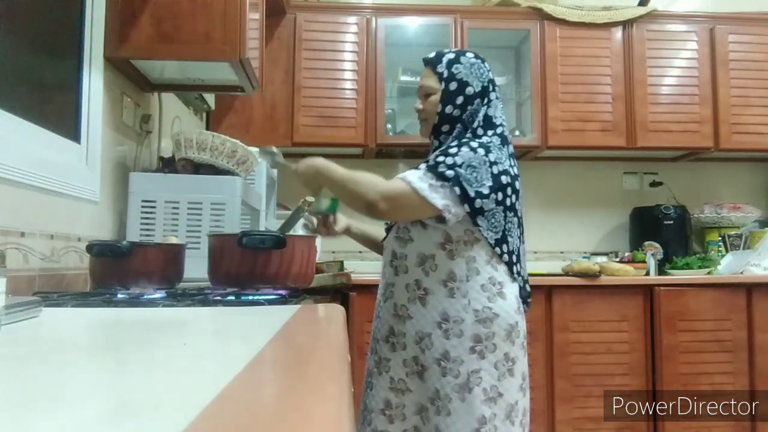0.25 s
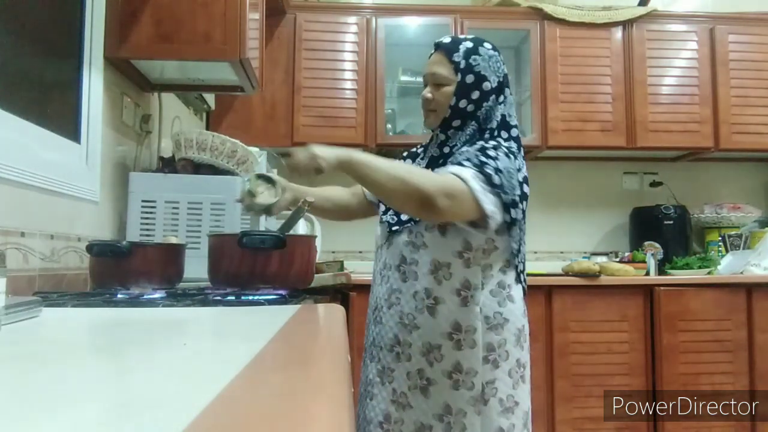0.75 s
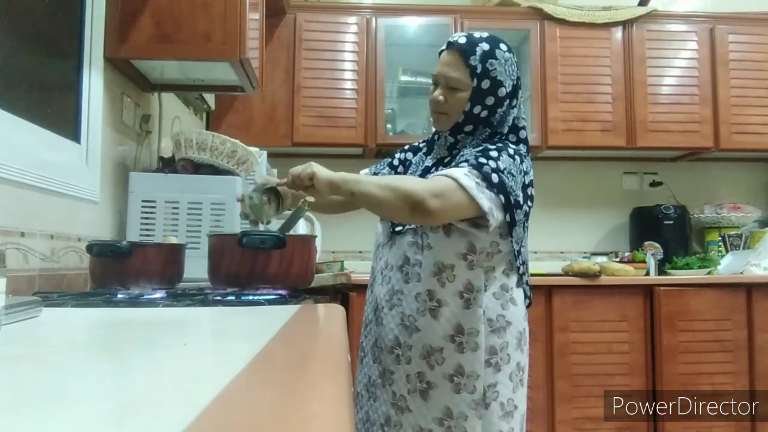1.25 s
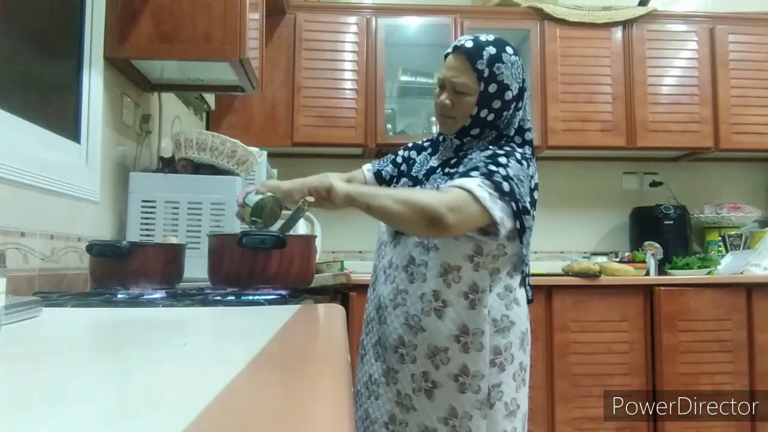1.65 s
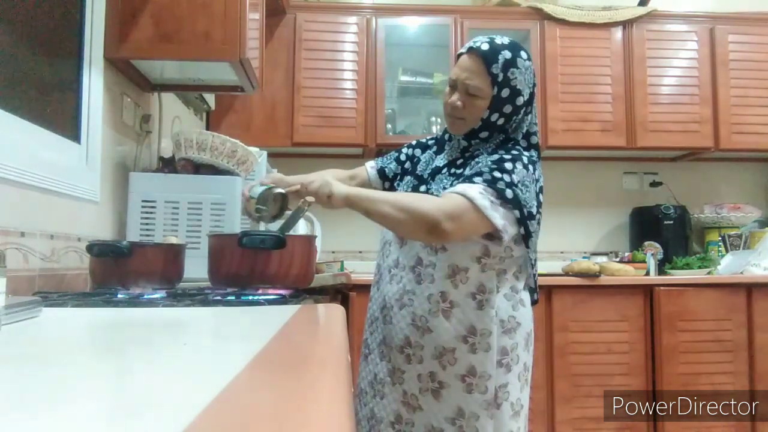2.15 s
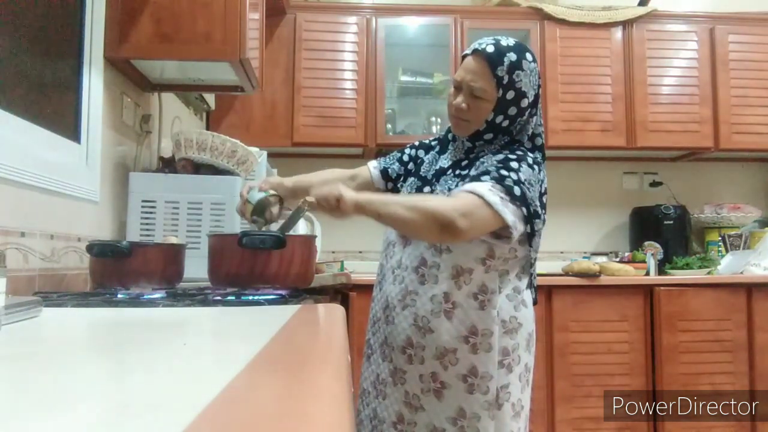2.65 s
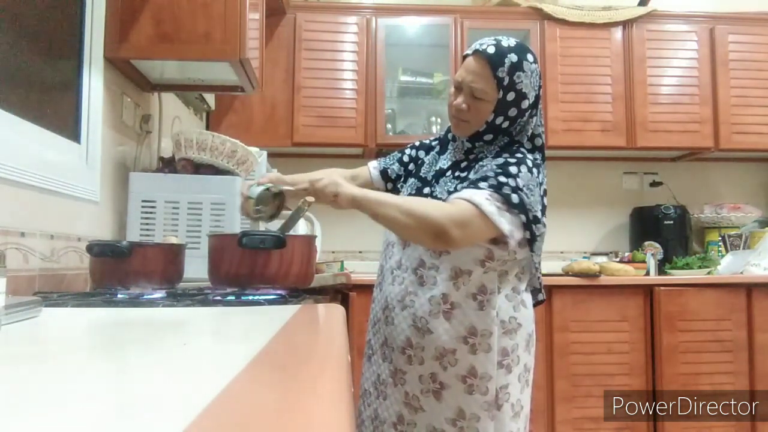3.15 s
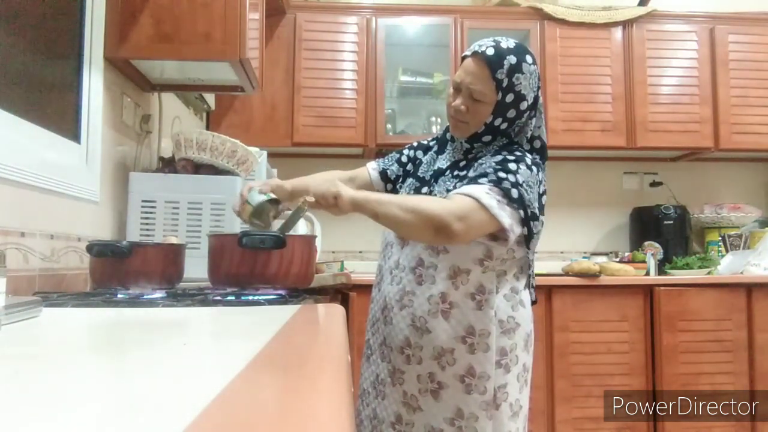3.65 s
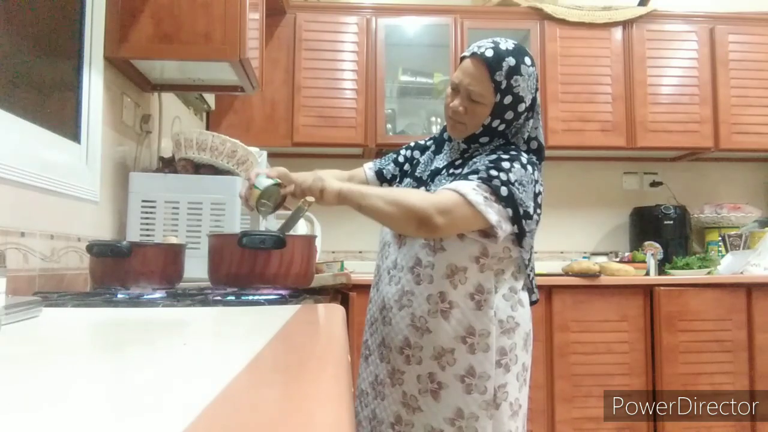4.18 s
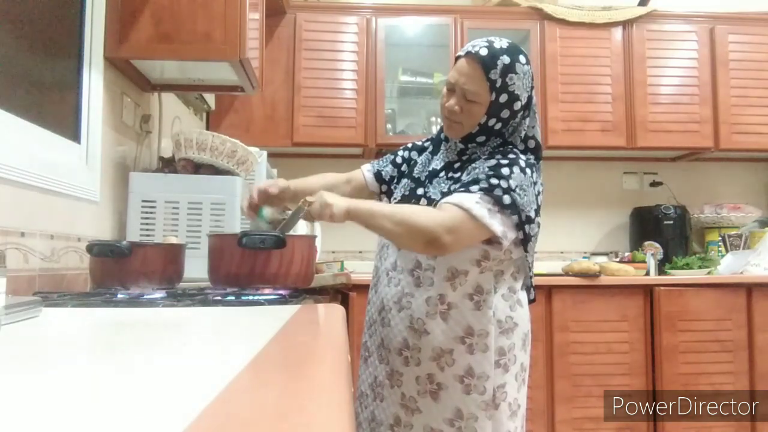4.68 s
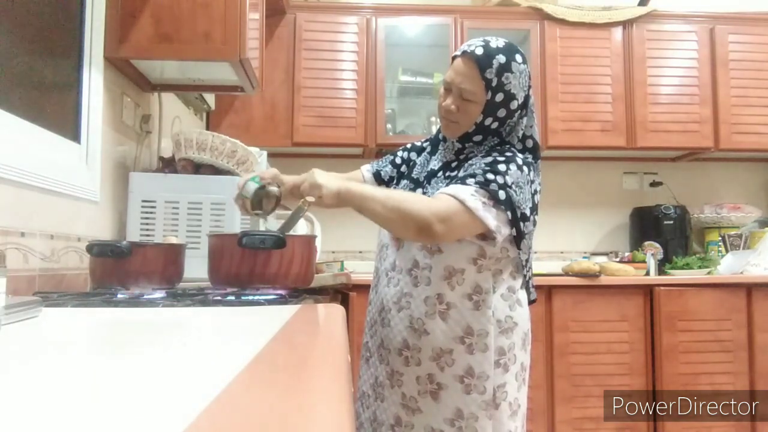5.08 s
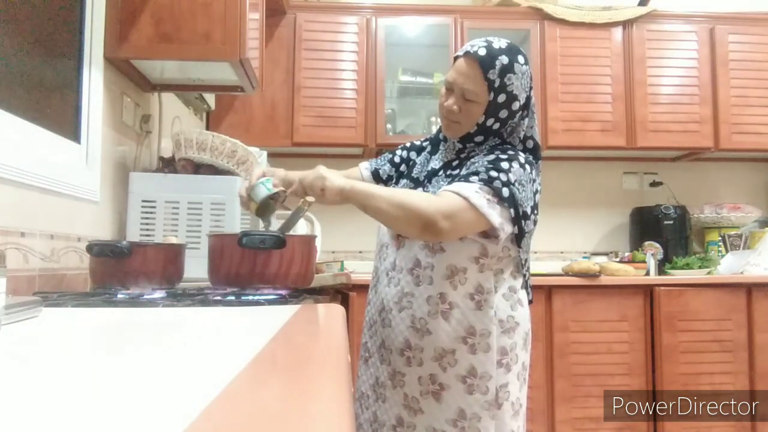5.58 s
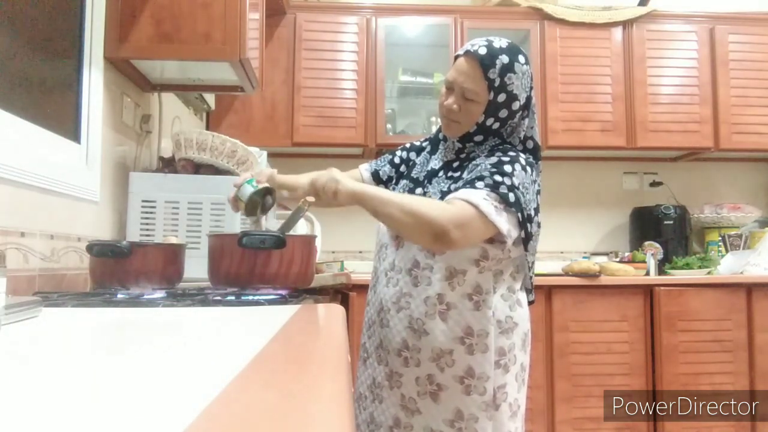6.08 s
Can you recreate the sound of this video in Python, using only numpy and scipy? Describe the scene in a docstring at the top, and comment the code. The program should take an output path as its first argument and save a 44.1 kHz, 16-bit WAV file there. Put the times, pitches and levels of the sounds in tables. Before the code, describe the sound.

A spoon works at a hand-held tin can above a simmering pot. Sizzle and fizz are strongest at the start and fade, leaving uneven bubbling, small squeaks and dull plops. Short, damped tinny knocks come singly, then in tight clusters with quick rebounds and sliding scrapes that sink in pitch. The hard-walled kitchen rings for about half a second. Single-channel household pickup, slightly processed, with soft burner noise underneath and a faint hollow note last.

```python
"""A metal spoon knocks on and slides along a hand-held open tin can, over a pot on a gas stove, in a tiled kitchen.
The knocks are banks of short damped modes with a noise crack; slides and rebounds follow, and the room rings on.
The pot's bubbling is resonances driven by tiny bursts; pings, squeaks, thuds and an early fizz join it.
The burner is shaped noise over a low hum; near the end a faint hollow tone sets in, a wavering sine."""
import sys
import numpy as np
from scipy import signal
from scipy.fft import rfft, irfft, next_fast_len
from scipy.io import wavfile
from scipy.ndimage import uniform_filter1d, map_coordinates

SR = 44100
rng = np.random.default_rng(int(sys.argv[2]) if len(sys.argv) > 2 else 0)


def unload_audio(sound):
    """Save the sound as a 16-bit wav file, at the path given as the first command line argument."""
    columns = np.transpose(np.atleast_2d(sound))
    # keep every value between -1 and 1, then stretch to whole-number steps
    steps = np.round(np.clip(columns, -1, 1) * 32767)
    wavfile.write(sys.argv[1], SR, steps.astype(np.int16))


N = 278887
TIME = np.arange(N) / SR
# Seven registers of the can's ring, from bottom boom to rim tick. Edges in Hz.
REGISTER_EDGES_HZ = [400, 850, 1700, 2550, 3850, 5200, 6700, 11000]


def gain_of(db):
    """Decibels to amplitude."""
    return 10 ** (np.asarray(db) / 20)


def evened(x):
    """Scales to rms 1."""
    return x / np.sqrt(np.mean(x ** 2) + 1e-20)


def read(points, hz):
    """Reads a spectrum on a log-frequency axis."""
    f, value = np.transpose(points)
    return np.interp(np.log(hz + 1), np.log(f + 1), value)


def curves(rows):
    """Each column after the time in seconds, as a curve over the whole time."""
    s, *columns = np.transpose(rows)
    return [np.interp(TIME, s, column) for column in columns]


def add(mix, s, sound):
    """Mixes a sound in at a time in seconds."""
    part = mix[max(round(s * SR), 0):][:len(sound)]
    part += sound[:len(part)]


def resonate(x, hz, width_hz):
    """One resonance, at rms 1."""
    b, a = signal.iirpeak(min(hz, .45 * SR), hz / width_hz, SR)
    return evened(signal.lfilter(b, a, x))


def kitchen(x, wet_db, gap_s=.003, early_db=-9, early_span_s=.03):
    """Direct sound, eight reflections off tiles and cupboards, and a tail with its own decay at each pitch."""
    # Each row: frequency in Hz, t60 in s.
    decay_times = [(100, 0.4), (300, 0.52), (800, 0.54), (2100, 0.48), (4500, 0.43), (8000, 0.16),
                   (15000, 0.4)]
    taps = rng.standard_normal(SR) * (rng.random(SR) < 5000 / SR)
    hz, t, z = signal.stft(taps, SR, nperseg=256)
    decay = gain_of(-60 * t / read(decay_times, hz)[:, None])
    tail = signal.istft(z * decay, SR, nperseg=256)[1]
    tail[:round(gap_s * SR)] = 0
    response = gain_of(wet_db) * tail / np.linalg.norm(tail)
    response[0] += 1
    at = (SR * (gap_s + early_span_s * rng.random(size=8))).astype(int)
    response[at] += gain_of(early_db) * rng.choice([-1, 1], size=8)
    return signal.fftconvolve(x, response / np.linalg.norm(response))[:N]


def stove(hiss_db=-60, waver_db=-1):
    """Burner hiss and room noise as shaped noise, over a hum of steady tones with a wavering part."""
    # Each row: frequency in Hz, relative density in dB per Hz.
    hiss_spectrum = [(25, -19), (45, -6.5), (80, -2.5), (125, 1.5), (220, -4.5), (280, -6.5), (400, -7),
                     (700, 5), (1400, -4), (3000, -2), (6000, -1), (7900, 5.5), (10500, -7.5), (15500, -21)]
    # Each row: frequency in Hz, width in Hz, level in dB before the swell.
    hum_tones = [(109.5, 7, -76), (154.5, 13.5, -80.5)]
    # Each row: time in s, hum gain in dB.
    hum_swell = [(0, 1), (2.3, 0.5), (2.7, 4), (3.3, -1), (6.32, 0)]
    size = next_fast_len(N)
    shape = gain_of(read(hiss_spectrum, np.fft.rfftfreq(size, 1 / SR)))
    hiss = irfft(rfft(rng.standard_normal(size)) * shape, size)[:N]
    hum = 0
    for hz, width_hz, db in hum_tones:
        waver = resonate(resonate(rng.standard_normal(N), hz, width_hz), hz, 3 * width_hz)
        steady = np.sqrt(2) * np.sin(2 * np.pi * hz * TIME)
        hum = hum + gain_of(db) * evened(steady + gain_of(waver_db) * waver)
    return gain_of(hiss_db) * evened(hiss) + gain_of(curves(hum_swell)[0]) * hum


def hollow_tone(waver=0.014, flutter_db=3.0, trim_db=-7):
    """A faint sine that sags and recovers, with random drift in pitch (rms share) and level (rms dB)."""
    # Each row: time in s, frequency in Hz, level in dB before trim and flutter.
    tone = [(5.915, 460, -91), (5.94, 463, -57), (6.06, 457.4, -52), (6.14, 438.5, -53.5),
            (6.19, 445.6, -54), (6.32, 474, -53)]
    hz, db = curves(tone)
    drift, flutter = (evened(uniform_filter1d(row, size=700)) for row in rng.standard_normal((2, N)))
    wave = np.sqrt(2) * np.sin(2 * np.pi * np.cumsum(hz * (1 + waver * drift)) / SR)
    return gain_of(db + trim_db + flutter_db * flutter) * (TIME > tone[0][0]) * wave


def simmer_levels_db():
    """Levels of the low bubbling, with its surges, and of the bright spatter; both fall slowly."""
    # Each row: centre in s, lift in dB.
    surges = [(.22, 2.5), (.86, 4.5), (1.08, 2), (1.55, 4.5), (1.801, 10.5), (2.36, 9), (2.93, 4.5),
              (3.68, 5.5), (3.96, 3.5), (4.12, 6.5), (5.17, 2.5), (5.4, -1.5), (6.05, 6)]
    surge_s, swell_db, swell_step_s = 0.1, 1, .16
    bubbling_db, bubbling_fall_db_per_s = -64.5, 0.6
    spatter_db, spatter_fall_db_per_s = -62, .5
    turns_s = np.arange(100) * swell_step_s
    swell = swell_db * np.interp(TIME, turns_s, rng.standard_normal(len(turns_s)))
    surge = sum(db * np.exp(-((TIME - s) / surge_s) ** 2) for s, db in surges)
    return (bubbling_db - bubbling_fall_db_per_s * TIME + swell + surge,
            spatter_db - spatter_fall_db_per_s * TIME + swell)


def pot(bursts_per_s=1200, spread_db=2.0, patchy_db=3.0, patch_s=.035, split_hz=1400):
    """Dense tiny bursts drive the pot's resonances; each swells and fades at random."""
    # Each row: frequency in Hz, width in Hz, level in dB relative to its side of the split.
    pot_modes = [(332.6, 13.4, -11), (600, 55, -1), (700, 70.5, 9), (1150, 39, -0.5), (1762.5, 31.6, 4),
                 (2053, 76, 3.5), (2312, 60, 8.5), (2900, 87, 5.5), (3660, 21, -2.5), (4050, 49, 4),
                 (4560, 220, 5.5), (5300, 98, -18), (5990, 99, 1)]
    strength = gain_of(spread_db * np.minimum(rng.exponential(1, N), 4))
    bursts = rng.standard_normal(N) * strength * (rng.random(N) < bursts_per_s / SR)
    knots_s, low, bright = np.arange(400) * patch_s, 0, 0
    for hz, width_hz, db in pot_modes:
        swell = gain_of(patchy_db * np.interp(TIME, knots_s, rng.standard_normal(len(knots_s))))
        ring = gain_of(db) * resonate(resonate(bursts * swell, hz, width_hz), hz, 4 * width_hz)
        if hz < split_hz:
            low = low + ring
        else:
            bright = bright + ring
    low_db, bright_db = simmer_levels_db()
    return gain_of(low_db) * evened(low) + gain_of(bright_db) * evened(bright)


def sizzle(pops_per_s=700, lo_hz=2100, hi_hz=9000, t60_s=0.029, spread_db=6.0, tilt_db_per_octave=-4):
    """Small bubbles burst in the hot pot, each a short ping of its own pitch."""
    # Each row: time in s, level in dB.
    sizzle_level = [(0, -61.5), (1.4, -61), (3, -67), (4.5, -70), (6.32, -101)]
    out, t = np.zeros(N), np.arange(2000) / SR
    rise = 1 - np.exp(-t / 0.0054)
    for when, place, size in rng.random((round(pops_per_s * N / SR), 3)):
        hz = lo_hz + (hi_hz - lo_hz) * place
        db = spread_db * min(-np.log(size + 1e-9), 3.5) + tilt_db_per_octave * np.log2(hz / lo_hz)
        add(out, when * N / SR, gain_of(db - 60 * t / t60_s) * rise * np.sin(2 * np.pi * hz * t))
    return gain_of(curves(sizzle_level)[0]) * evened(out)


def fizz(ticks_per_s=2500, lo_hz=2800, hi_hz=4050, start_db=-61, fall_db_per_s=21):
    """Band-passed random ticks: a fine, even fizz that soon dies away."""
    ticks = rng.standard_normal(N) * (rng.random(N) < ticks_per_s / SR)
    sos = signal.butter(3, (lo_hz, hi_hz), "band", fs=SR, output="sos")
    return gain_of(start_db - fall_db_per_s * TIME) * evened(signal.sosfilt(sos, ticks))


def squeak(hz, db, length_s, width_hz=42, glide_hz=100):
    """Noise through one narrow resonance, resampled so that it slides a little up or down."""
    drive = rng.standard_normal(SR // 2)[:round(length_s * SR)]
    note = resonate(resonate(drive, hz, width_hz), hz, 2 * width_hz)
    speed = 1 + glide_hz / hz * rng.uniform(-0.97, 1) * np.linspace(-1, 1, len(note))
    return gain_of(db) * map_coordinates(note, [np.cumsum(speed)]) * signal.windows.tukey(len(note), .5)


def squeaks(trim_db=-4):
    """Clear squeaks of steam and of the spoon on the tin, and a thinning scatter of faint ones."""
    # Each row: start in s, frequency in Hz, level in dB before the trim, length in s.
    clear_squeaks = [(0.084, 10340, -64, 0.1), (0.138, 4010, -51.5, 0.063), (0.172, 9380, -64, 0.09),
                     (0.282, 9480, -56.5, 0.081), (0.417, 13200, -70, 0.046), (0.594, 9650, -61, 0.21),
                     (0.707, 4730, -56, 0.072), (0.774, 2915, -50, 0.03), (1.146, 2914, -55, .06),
                     (1.426, 4730, -60, 0.03), (1.45, 7520, -58, 0.038), (1.949, 4560, -55, 0.19),
                     (2.046, 3010, -54.5, 0.077), (2.472, 4050, -61, 0.093), (2.541, 1770, -61.5, 0.051),
                     (2.605, 4660, -55.5, 0.036), (2.622, 984, -62, 0.12), (2.65, 2804, -60.5, 0.046),
                     (2.661, 4050, -59, 0.047), (2.815, 2855, -57, 0.041), (2.875, 4526, -55.5, .05),
                     (3.08, 5375, -59.5, 0.045), (3.241, 4050, -52.5, 0.021), (3.575, 2896, -57.5, 0.047),
                     (3.635, 2523, -54, 0.034), (3.824, 9700, -56, 0.048), (4.438, 2140, -56, 0.061),
                     (4.577, 2730, -62, .04), (4.645, 2994, -60, 0.028), (4.827, 966, -51.5, 0.085),
                     (4.96, 3970, -56, 0.013), (5.013, 4520, -57.5, 0.035), (5.056, 1034, -60, 0.102),
                     (5.254, 4450, -57.5, 0.034), (5.352, 2363, -59, 0.048), (5.382, 4580, -56.5, 0.039),
                     (5.538, 2940, -55.5, 0.039), (5.729, 4500, -54, .05), (5.798, 2336, -60.5, 0.054),
                     (6.008, 2880, -58, 0.047), (6.06, 4494, -53.5, 0.022)]
    stray_per_s, calm_s = 42, 1.4  # rate at the start, time in which it falls to 1/e
    lo_hz, hi_hz, stray_s = 2402, 10840, 0.0395
    stray_db, rise_db_per_s, tilt_db_per_octave = -65, 0.2, -1.5
    out = np.zeros(N)
    for s, hz, db, length_s in clear_squeaks:
        add(out, s, squeak(hz, db + trim_db, length_s))
    for when, place, span in rng.random((round(stray_per_s * calm_s), 3)):
        start_s = -calm_s * np.log(1 - when)
        octaves = place * np.log2(hi_hz / lo_hz)
        db = stray_db + tilt_db_per_octave * octaves + rise_db_per_s * start_s
        add(out, start_s, squeak(lo_hz * 2 ** octaves, db, stray_s * (.5 + span)))
    return out


def bumps(swell_s=0.011, trim_db=-5):
    """Bumps of the can and food dropping into the pot: soft-started, quickly damped sines; crumbs thin out."""
    # Each row: start in s, frequency in Hz, level in dB before the trim.
    clear_bumps = [(0.122, 338, -59.5), (.248, 334, -61), (0.483, 115, -57), (.85, 617, -51.5),
                   (1.12, 378, -59.5), (1.321, 140, -58.5), (1.79, 114, -60), (1.809, 352, -63),
                   (2.215, 324, -59), (2.325, 585, -53.5), (2.465, 609, -56.5), (2.919, 347, -56.5),
                   (3.402, 338, -58.5), (3.618, 700, -52.5), (3.69, 690, -54.5), (4.38, 345, -59.5),
                   (4.396, 600, -41), (4.49, 640, -53), (4.66, 690, -55.5), (4.722, 620, -46.5),
                   (4.97, 617, -49.5), (5.155, 607, -54.5), (6.052, 152, -58)]
    crumbs_per_s, crumb_lo_hz, crumb_hi_hz, crumb_db = 3.6, 300, 518, -72
    out, t = np.zeros(N), np.arange(SR // 4) / SR
    shape = (t / swell_s * np.exp(1 - t / swell_s)) ** 2
    for s, hz, db in clear_bumps:
        add(out, s, gain_of(db + trim_db) * shape * 2 * np.sin(2 * np.pi * hz * t))
    for when, place in rng.random((round(crumbs_per_s * N / SR), 2)):
        hz = crumb_lo_hz + (crumb_hi_hz - crumb_lo_hz) * place
        add(out, when ** 2 * N / SR, gain_of(crumb_db) * shape * 2 * np.sin(2 * np.pi * hz * t))
    return out


def blow(registers_db, crack_db, lift_db, notes_hz, detune=0.0015, crack_t60_s=0.011, spread_db=3.0,
         rise_cycles=1.4):
    """One contact: the can's modes build up within a few cycles, over a short crack; picked ones stand out."""
    # Modes of the hand-held can and spoon. Each row: frequency in Hz, level in dB within its register, t60 in s.
    can_modes = [(590, -1, .07), (655, 0, .08), (695, 0, .07), (735, -3, .05), (860, -5, .04),
                 (960, -3, .04), (1040, -4, .05), (1150, -3, .05), (1233, -3, .05), (1324, -5, .04),
                 (1500, -1, .05), (1715, -3, .05), (1950, -3, .06), (2010, -5, .05), (2081, -2, .07),
                 (2196, 0, .08), (2275, -4, .05), (2430, -6, .04), (2520, -6, .04), (2680, -3, .05),
                 (2740, -4, .04), (2840, -4, .05), (2955, -2, .06), (3030, -4, .04), (3290, -1, .05),
                 (3430, -1, .05), (3550, -1, .06), (3680, -3, .05), (3840, -5, .04), (4050, 0, .06),
                 (4120, -1, .05), (4260, -1, .05), (4350, -2, .04), (4420, -1, .05), (4570, -1, .09),
                 (4850, -2, .05), (5130, -4, .04), (5330, -3, .03), (5690, -3, .03), (5970, 0, .06),
                 (6260, -2, .03), (7100, -3, .04), (7500, -2, .05), (8280, -5, .04), (9545, -7, .05)]
    rank_step_db = 0.86  # each picked mode is lifted this much less than the one before
    t = np.arange(6000) / SR
    hz, db, t60_s = np.transpose(can_modes)[:, :, None]
    luck, shift, turn = rng.standard_normal((len(can_modes), 3)).T[:, :, None]
    lifts = []
    for rank, note_hz in enumerate(notes_hz):
        distance_hz = abs(hz - note_hz)
        lifts.append((lift_db - rank_step_db * rank) * (distance_hz == distance_hz.min()))
    db = db + spread_db * luck + np.max(lifts, axis=0) - 60 * t / t60_s
    modes = gain_of(db) * np.sin(2 * np.pi * hz * (1 + detune * shift) * t)
    modes *= np.sign(turn) * (1 - np.exp(-t * np.minimum(hz, 4000) / rise_cycles))
    crack = rng.standard_normal(len(t)) * gain_of(-60 * t / crack_t60_s)
    out = 0
    for lo_hz, hi_hz, level_db in zip(REGISTER_EDGES_HZ, REGISTER_EDGES_HZ[1:], registers_db):
        ring = evened(modes[(hz[:, 0] >= lo_hz) & (hz[:, 0] < hi_hz)].sum(0))
        sos = signal.butter(3, [lo_hz, min(hi_hz, 8500)], "band", fs=SR, output="sos")
        rough = evened(signal.sosfilt(sos, crack))
        out = out + gain_of(level_db) * evened(ring + gain_of(crack_db) * rough)
    return out


def slide(ring, length_s, sag_per_s, slips_per_s=600, bend=0.013, bend_step_s=0.038):
    """The spoon slips along the tin; its pressure flexes the wall, so the modes wander and sink."""
    t, turns_s = np.arange(SR // 2) / SR, np.arange(40) * bend_step_s
    envelope = t * np.exp(-(2 * t / length_s) ** 2)
    slips = rng.standard_normal(len(t)) * (rng.random(len(t)) < slips_per_s / SR) * envelope
    scrape = signal.fftconvolve(slips, ring)[:len(t)]
    scrape = scrape * np.linalg.norm(ring) / np.linalg.norm(scrape)
    speed = 1 - sag_per_s * t + bend * np.interp(t, turns_s, rng.standard_normal(len(turns_s)))
    return map_coordinates(scrape, [np.cumsum(speed)])


def knocks(low_hz=400):
    """Each knock, the short scrape that follows it, and rebounds that each lift (or, once, dip) the ring around
    one pitch."""
    # Where the spoon lands sets the registers and modes. Each row: start in s, level of each register in dB,
    # crack against ring in dB, lift of the picked modes in dB, slide against ring in dB, slide length in s,
    # pitch sag in share per s, picked modes in Hz with the strongest first.
    knock_rows = [(1.2219, (-70.5, -56, -59.5, -52, -64, -76, -90),
                  -43, 23.5, -8.5, 0.047, .03, (3290, 960, 3680, 2955, 1040, 1950, 2275, 4050, 2840, 3430)),
                  (2.211, (-63.5, -56.5, -57, -60, -52, -57, -60.5),
                  -17, 18, -24, 0.091, 0.17, (2275, 1150, 735, 4050, 4420, 2955, 4850, 7500, 5690, 6260)),
                  (3.329, (-67, -59.5, -80, -60, -58.5, -64, -73),
                  -25, 16, -3.5, .035, 0.075, (4120, 1500, 5970, 3030, 2955, 5130)),
                  (3.342, (-60, -71, -69, -76, -76, -82, -87),
                  -28, 39, -5, 0.034, .1, (590, 1233, 695, 2010)),
                  (3.3929, (-48, -47.5, -52.5, -55.5, -61, -71, -66),
                  -11.5, 15.5, -14, .13, 0.067, (695, 1233, 1715, 1324, 3550, 2275, 2430, 5130, 4570, 8280)),
                  (4.172, (-94, -56, -80, -86, -85, -74.5, -71), -34, 26, -28, .04, .05, (1500,)),
                  (4.219, (-50, -51.5, -45, -56, -63.5, -85, -67),
                  -31, 21.5, -19, 0.029, .05, (2081, 695, 2196, 1500, 1233, 3550, 4350, 2840, 3840, 2680, 8280)),
                  (4.311, (-64, -69.5, -59.5, -60, -79, -85, -85),
                  -8, 18, 0, 0.062, 0.26, (3550, 2196, 590, 2840, 2680, 1233)),
                  (4.357, (-64, -58.5, -66, -60, -78, -85, -85),
                  -14, 10, -12, 0.06, 0.17, (1500, 3430, 2196, 590)),
                  (4.741, (-49, -50.5, -56.5, -53, -58.5, -54.5, -63),
                  -27, 22, -11.5, 0.044, .05, (1500, 655, 2955, 1150, 4420, 5970, 1950, 2275, 3290, 9545)),
                  (4.758, (-50, -58.5, -54, -59.5, -57.5, -74, -69),
                  -30, 34, -4.5, 0.054, 0.21, (655, 1950, 2196, 4420, 1150, 2081, 3290, 4850, 2740)),
                  (4.812, (-62, -53.5, -55, -62.5, -59, -68, -80),
                  -17, 20, -5, 0.063, 0.42, (1150, 860, 2081, 4260, 4120, 3290, 2520, 1950)),
                  (4.879, (-68, -63, -71, -65.5, -89, -88, -86),
                  -16, 28, -7, 0.055, 0.46, (1040, 1150, 2740, 1324, 3290, 2081, 655)),
                  (5.46, (-63.5, -60.5, -60.5, -72, -67, -90, -87),
                  -36, 32, -11.5, 0.023, .1, (1500, 2196, 590, 1040, 4050, 4570, 2740)),
                  (5.6129, (-58.5, -57, -65.5, -48.5, -49, -67, -69),
                  -9, 16, -5, 0.15, 0.094, (3430, 1500, 590, 4260, 4570, 1233, 4050, 3550, 7100))]
    # Each row: start in s, level in dB against the knock before, favoured frequency in Hz, lift there in dB.
    rebounds = [(1.274, -11.5, 2140, 5.5), (2.243, -14.5, 1200, 10), (2.291, -14.5, 1310, 7.5),
                (3.412, -12, 700, 9), (3.453, -10.5, 2200, 8), (3.564, -19.5, 1300, 2.5),
                (4.2232, -1, 2100, 4.5), (4.236, -16, 660, 19), (5.6171, 2.5, 4400, -3),
                (5.628, -18.5, 585, 22.5), (5.645, -10.5, 4320, 8)]
    focus_octaves = 0.41  # spread of a rebound's lift
    flex = 0.015  # rms share by which modes shift once the spoon presses into the thin wall
    out, edges_hz = np.zeros(N), np.array(REGISTER_EDGES_HZ)
    centres_hz = np.sqrt(edges_hz[:-1] * edges_hz[1:])
    for s, registers_db, crack_db, lift_db, slide_db, slide_s, sag_per_s, notes_hz in knock_rows:
        ring = blow(registers_db, crack_db, lift_db, notes_hz)
        add(out, s, ring)
        add(out, s, gain_of(slide_db) * slide(ring, slide_s, sag_per_s))
    for s, db, focus_hz, boost_db in rebounds:
        knock_before = [row for row in knock_rows if row[0] < s][-1]
        _, registers_db, crack_db, lift_db, *_, notes_hz = knock_before
        focus_db = boost_db * np.exp(-(np.log2(centres_hz / focus_hz) / focus_octaves) ** 2)
        add(out, s, blow(np.array(registers_db) + db + focus_db, crack_db, lift_db, notes_hz, detune=flex))
    # a can this small radiates no bass
    return signal.sosfilt(signal.butter(4, low_hz, "high", fs=SR, output="sos"), out)


def suppress(x, over_db=4.5, knee_db=1.0, depth_db=6):
    """Noise suppressor: only what stands clear of the usual level at its pitch gets the full gain, depth_db."""
    z = signal.stft(x, nperseg=512, noverlap=384)[2]
    power = uniform_filter1d(uniform_filter1d(abs(z) ** 2, size=3, axis=-2), size=5, axis=-1)
    power_db = 10 * np.log10(abs(power) + 1e-20)
    excess_db = power_db - np.percentile(power_db, 35, axis=-1, keepdims=True)
    opening = .5 + .5 * np.tanh((excess_db - over_db) / knee_db)
    return signal.istft(z * gain_of(depth_db * opening), nperseg=512, noverlap=384)[1][:, :N]


def scene():
    """Can, pot and bumps ring in the kitchen; the hollow tone and the stove are added without it."""
    struck = kitchen(knocks(), wet_db=1.5, early_db=-14, early_span_s=.036)
    small = kitchen(pot() + squeaks() + sizzle() + fizz(), wet_db=1.5)
    dull = kitchen(bumps(), wet_db=-4.0, early_db=-9.5)
    return (struck + small + dull + hollow_tone() + stove())[None]


def record(dry):
    """The recorder's noise suppressor and upper band limit."""
    edge_hz = 15500
    lowpass = signal.firwin(511, edge_hz, window=("kaiser", 9), fs=SR)
    return signal.oaconvolve(suppress(dry), lowpass[None], "same")


dry = scene()
out = record(dry)
unload_audio(out)
```